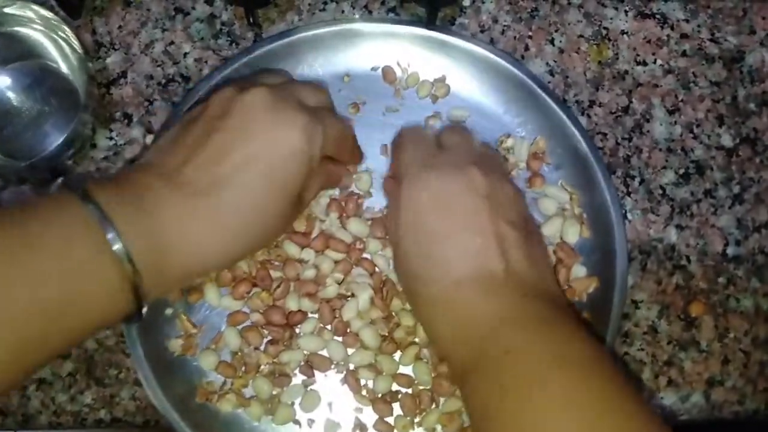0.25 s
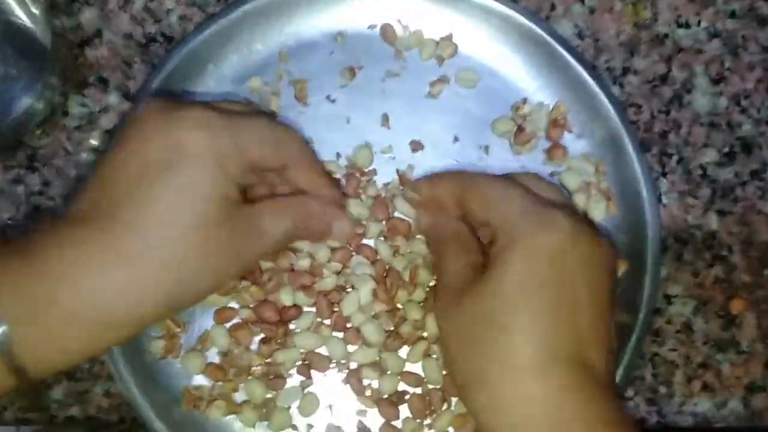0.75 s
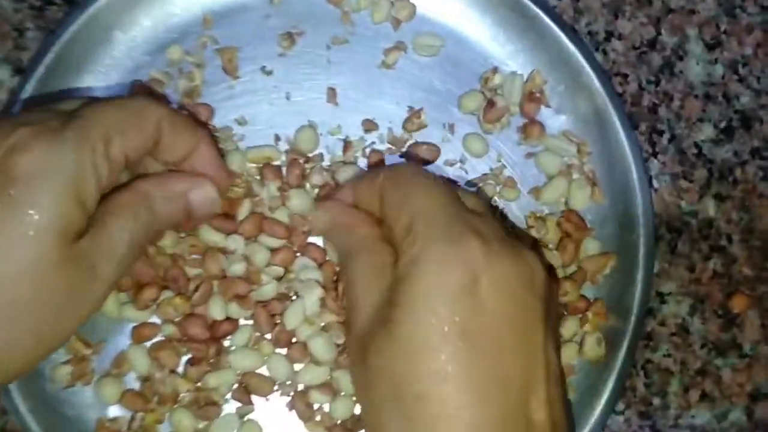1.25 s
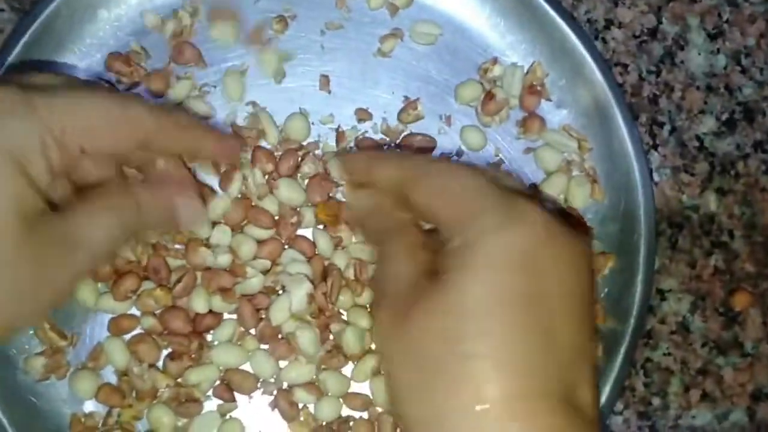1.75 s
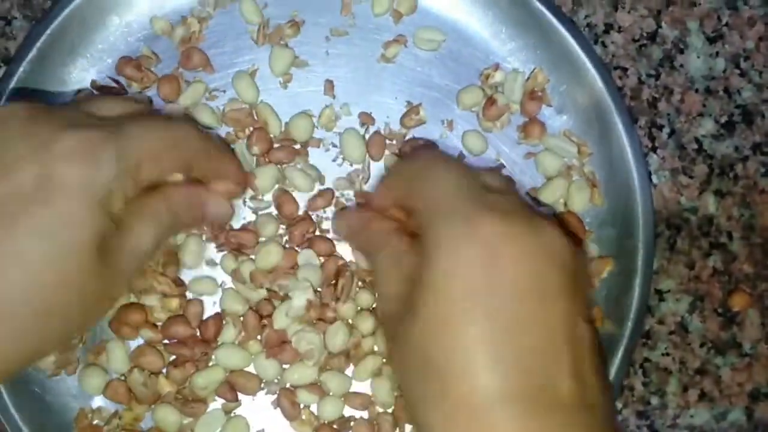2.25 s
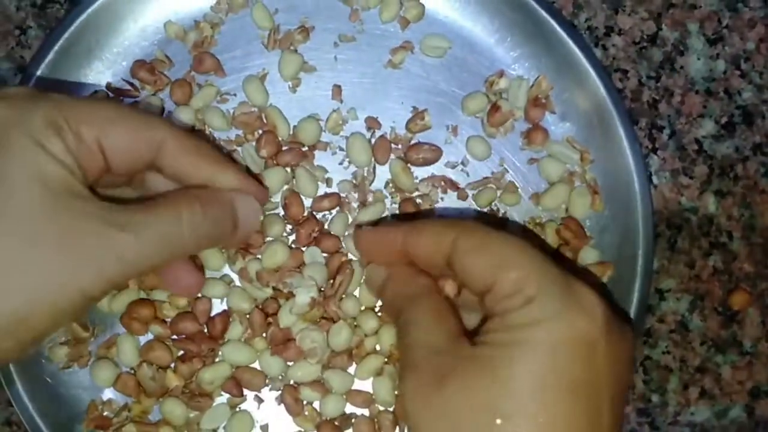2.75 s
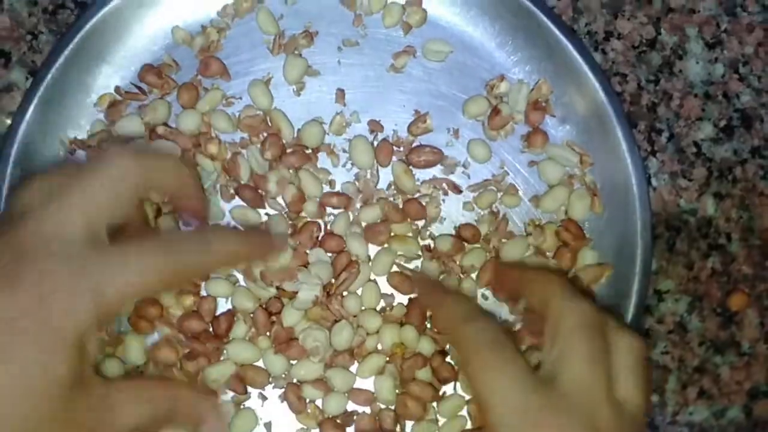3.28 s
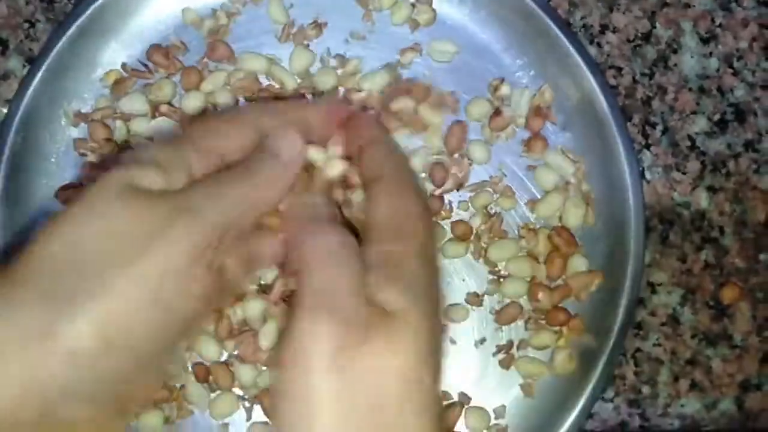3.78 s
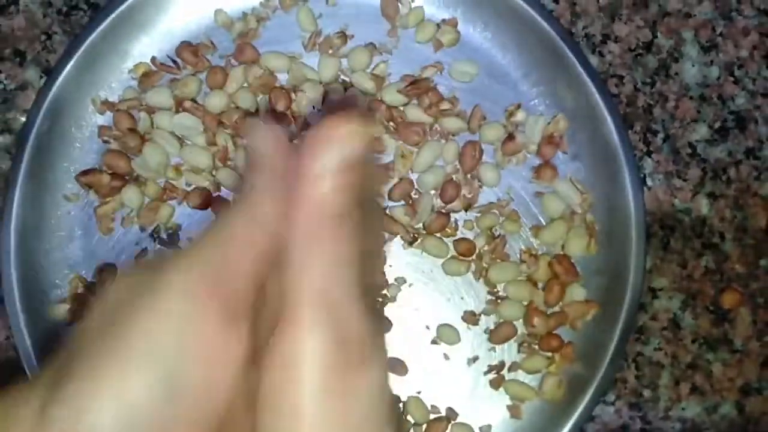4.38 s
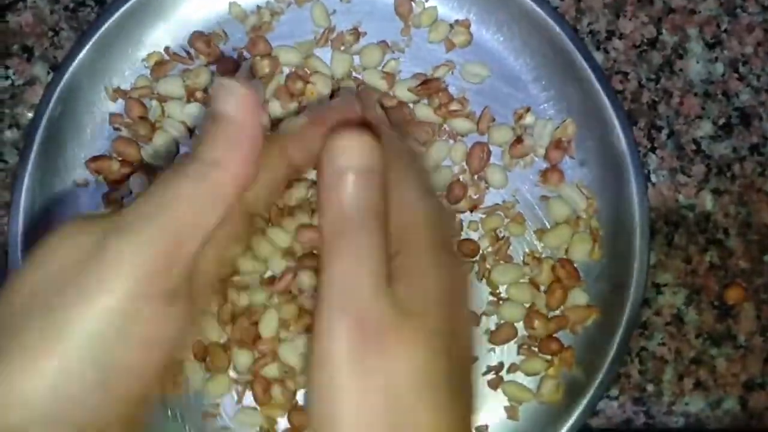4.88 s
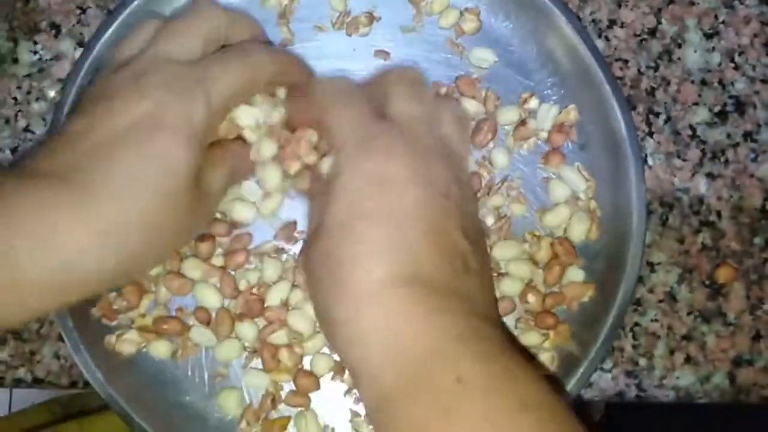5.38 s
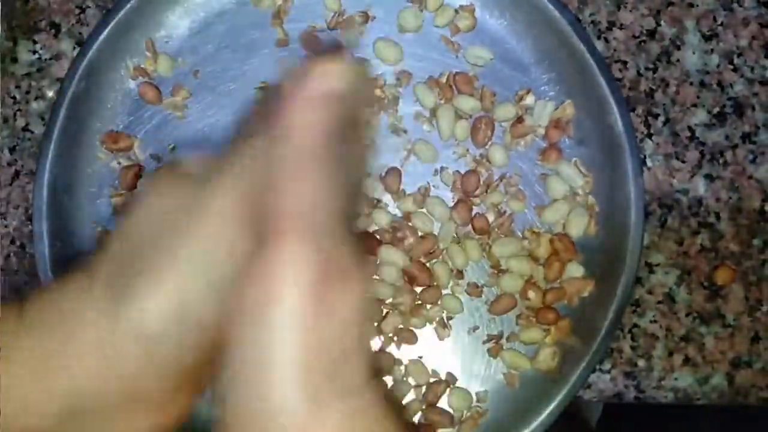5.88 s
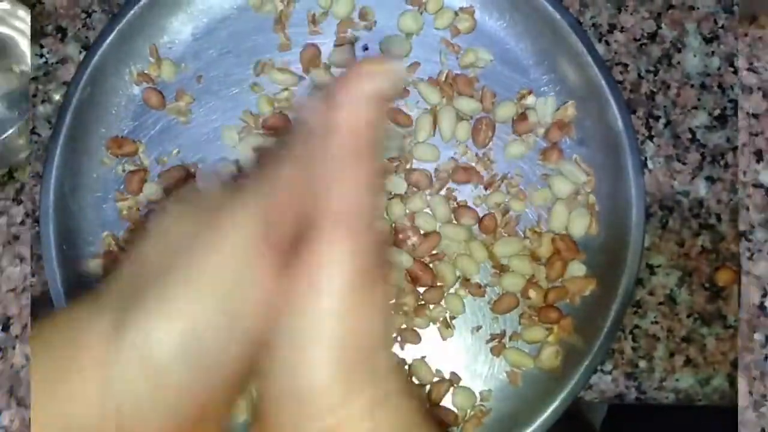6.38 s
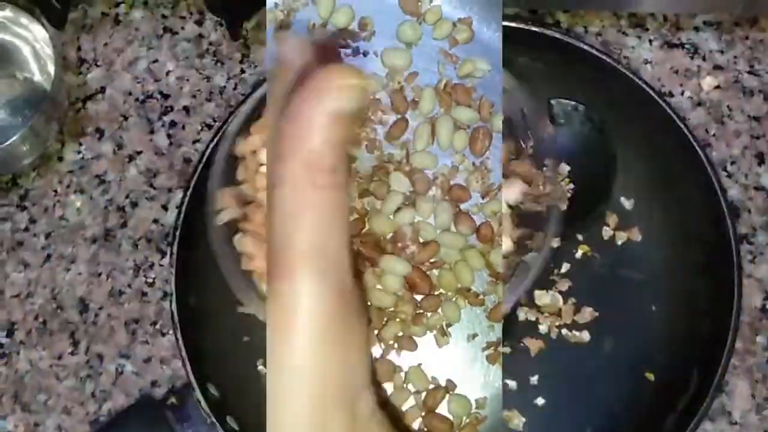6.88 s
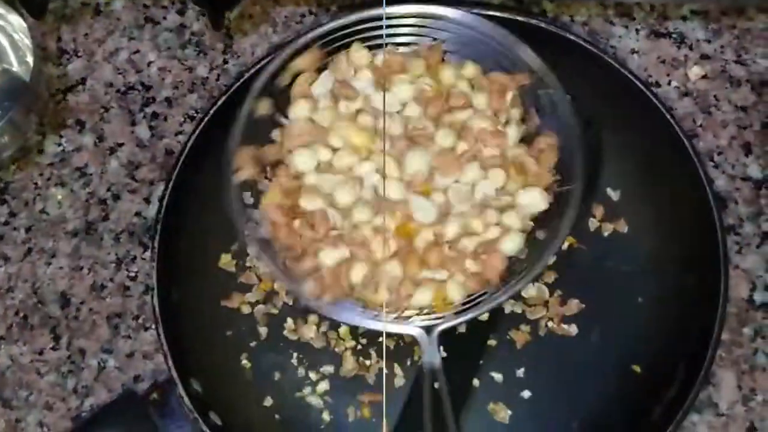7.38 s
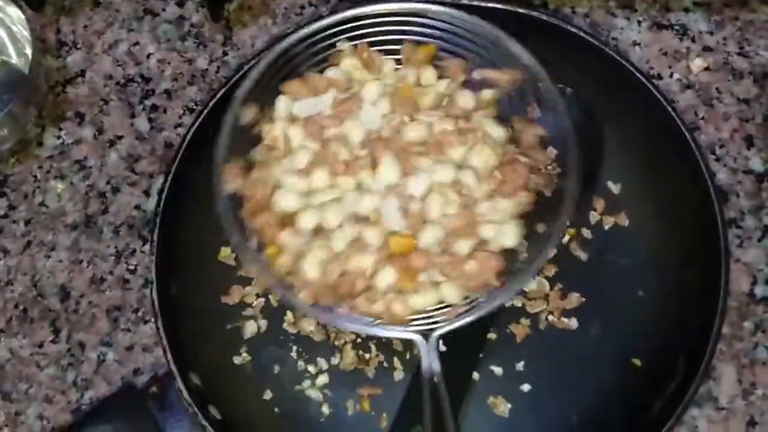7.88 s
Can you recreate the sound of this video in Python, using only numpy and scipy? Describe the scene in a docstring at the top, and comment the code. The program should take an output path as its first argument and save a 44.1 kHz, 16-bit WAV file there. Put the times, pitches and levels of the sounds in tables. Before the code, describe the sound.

Dry roasted peanuts patter and papery skins rustle as hands rub them over a steel plate, with a broad hiss swelling near the end.

```python
"""Fingers and palms rub roasted peanuts over a steel plate in a humming kitchen, close to a small microphone.
From the start nuts patter and papery skins rustle: showers of small knocks and snaps made of shaped noise.
A faint wavering sine comes and goes in the first two seconds; single knocks excite the plate's decaying
rings, skins snap as bright noise bursts and short sines squeak softly. Near the end the room's noise and
hum quickly give way to a swelling broad hiss with a lower hum, while the handling goes on and then fades."""
import sys
import numpy as np
from scipy import signal
from scipy.io import wavfile
from scipy.ndimage import uniform_filter1d, minimum_filter1d

SR = 44100
rng = np.random.default_rng(int(sys.argv[2]) if len(sys.argv) > 2 else 0)


def unload_audio(sound):
    """Save the sound as a 16-bit wav file, at the path given as the first command line argument."""
    columns = np.transpose(np.atleast_2d(sound))
    # keep every value between -1 and 1, then stretch to whole-number steps
    steps = np.round(np.clip(columns, -1, 1) * 32767)
    wavfile.write(sys.argv[1], SR, steps.astype(np.int16))


N = 358974

# spectrum of the plate's crowded modes: (frequency [Hz], level [dB])
CROWDED_MODES = [(180, -53.5), (300, -36), (1060, -19.5), (1430, -5), (2930, -2), (3190, -7), (3350, -7),
                 (4230, -9), (6740, -15.5), (9240, -42.5), (16000, -37)]
CHANGE_S = 6.935  # the room starts to give way to the hiss


def gain_of(db):
    """Decibels to gain."""
    return 10 ** (np.asarray(db) / 20)


def evened(x):
    """Scales to rms 1."""
    return x / np.sqrt(np.mean(x ** 2) + 1e-20)


def read(points, hz):
    """Reads a spectrum on a log-frequency axis."""
    f, value = np.transpose(points)
    return np.interp(np.log(hz + 1), np.log(f + 1), value)


def curve(rows, column):
    """One column of a table, interpolated at every sample."""
    rows = np.asarray(rows)
    return np.interp(np.arange(N) / SR, rows[:, 0], rows[:, column])


def drift(count, size):
    """Slow random movement at rms 1: noise averaged over size samples."""
    return evened(uniform_filter1d(rng.standard_normal(count), size=size))


def add(mix, s, sound):
    """Mixes a sound in at a time."""
    part = mix[round(s * SR):][:len(sound)]
    part += sound[:len(part)]


def coloured(x, db_of_hz):
    """Causal filter with the given gain: the phase follows from the log gain."""
    hz = abs(np.fft.fftfreq(1024, 1 / SR))
    log_gain = np.log(gain_of(np.maximum(db_of_hz(hz), -100)))
    taps = np.fft.ifft(np.exp(np.conj(signal.hilbert(log_gain)))).real
    early, late = taps[:512], taps[512:]
    if abs(early).sum() > abs(late).sum():
        taps = early
    else:  # the response came out backwards in time
        taps = np.roll(taps[::-1], 1)[:512]
    return signal.oaconvolve(x, taps)[:len(x)]


def in_band(x, lo_hz, hi_hz):
    """Band-pass, used to read a level."""
    return signal.sosfilt(signal.butter(3, [lo_hz, hi_hz], "bandpass", fs=SR, output="sos"), x)


def peak_set(x, db, lo_hz, hi_hz):
    """Scales so that the loudest 4 ms of a band has the level db."""
    power = uniform_filter1d(in_band(x, lo_hz, hi_hz) ** 2, size=176)
    return x * gain_of(db) / np.sqrt(power.max())


def shower(sounds, per_s, spread_db):
    """Many small sounds at random moments, a few of them large."""
    starts = rng.random(N) < per_s / SR
    size = gain_of(spread_db * np.minimum(rng.exponential(1, N), 3)) * starts
    which = rng.integers(0, len(sounds), N)
    return sum(signal.oaconvolve(size * (which == k), evened(s))[:N] for k, s in enumerate(sounds))


def wash(spectrum, patchy_db):
    """Steady noise whose spectrum has patches drifting in time and frequency."""
    size = 4096
    frames, hz = N // 1024 + 6, np.fft.rfftfreq(size, 1 / SR)
    a, b, patches = rng.standard_normal((frames, len(hz), 3)).T
    patches = uniform_filter1d(patches, size=40, axis=0)  # over frequency
    patches = evened(uniform_filter1d(patches, size=4, axis=1))  # over time
    z = (a + 1j * b) * gain_of(read(spectrum, hz)[:, None] + patchy_db * patches)
    return evened(signal.istft(z, nperseg=size, noverlap=3072)[1][:N])


def sine(hz):
    """A steady sine at rms 1."""
    return np.sqrt(2) * np.sin(hz * 2 * np.pi * np.arange(N) / SR)


def room():
    """Patchy room noise with a sine hum; it sinks before the hiss enters."""
    # room noise spectrum: (frequency [Hz], level [dB])
    room_spectrum = [(5, 6), (20, 1), (45, -3.5), (75, -3), (100, -8.5), (125, -2.5), (250, -11.5),
                     (530, -9.5), (900, -13.5), (1800, -12), (4500, -26.5), (6700, -43), (9400, -30),
                     (15300, -10.5)]
    # sinking of the room: (from [s], to [s], final change [dB])
    from_s, to_s, sag_db = (5.6, 6.3, -5)
    noise_db, hum_hz, hum_over_noise_db = -41.5, 99.8, -15
    tone = gain_of(hum_over_noise_db) * sine(hum_hz)
    sag = gain_of(np.interp(np.arange(N) / SR, [from_s, to_s], [0, sag_db]))
    return gain_of(noise_db) * (wash(room_spectrum, 1.54) + tone) * sag


def hiss():
    """Broad patchy noise with a sine hum; it enters softer and swells exponentially."""
    # hiss spectrum: (frequency [Hz], level [dB])
    hiss_spectrum = [(12, -31), (20, 10.5), (55, -27), (93, 2.5), (116, -42), (146, -3.5), (241, -15),
                     (301, -3), (367, -8.5), (825, -4), (2390, -10.5), (4540, -22), (6720, -18.5),
                     (9140, -31.5), (16000, -12.5)]
    swollen_db, hum_hz, hum_over_noise_db = -32.5, 89, -17.5
    start_db, swell_s = -6.5, .22  # start against the swollen level; time constant
    tone = gain_of(hum_over_noise_db) * sine(hum_hz)
    since = np.maximum(np.arange(N) / SR - CHANGE_S, 0)
    swell = gain_of(start_db * np.exp(-since / swell_s))
    return gain_of(swollen_db) * (wash(hiss_spectrum, 1.4) + tone) * swell


def faint_tone():
    """A sine with a wavering phase comes and goes early on."""
    # rms of the tone: (time [s], level [dB])
    tone_levels = [(.25, -80), (.5, -55), (.75, -68), (.95, -59), (1.35, -56.5), (1.6, -64), (1.9, -94)]
    tone_hz = 763
    waver = 1.2 * drift(N, 3000)  # radians
    turns = 2 * np.pi * np.arange(N) / SR
    return np.sqrt(2) * gain_of(curve(tone_levels, column=1)) * np.sin(tone_hz * turns + waver)


def lurch():
    """The rest level swings as a decaying sine, below hearing, where the hiss comes in."""
    start_s, size, swing_hz, decay_s = 6.938, .167, 2.4, .1
    t = np.maximum(np.arange(N) / SR - start_s, 0)
    swing = size * np.sin(2 * np.pi * swing_hz * t) * np.exp(-t / decay_s)
    return uniform_filter1d(swing, size=300)


def background():
    """The room gives way to the hiss at equal power; the faint tone and the swing lie beside them."""
    fade_s = .016
    changed = np.clip((np.arange(N) / SR - CHANGE_S) / fade_s, 0, 1)
    return room() * np.sqrt(1 - changed) + hiss() * np.sqrt(changed) + faint_tone() + lurch()


def squeak(db, hz, length):
    """A sine of slightly unsteady pitch under a soft hump."""
    t = np.arange(0, length, 1 / SR)
    wobble = 1 + .05 * drift(len(t), 90)
    tone = np.sin(2 * np.pi * np.cumsum(hz * wobble) / SR)
    return np.sqrt(2) * gain_of(db) * tone * signal.windows.tukey(len(t), .6)


def snap(t60, body_db):
    """A papery crack of decaying noise with its short bright tail."""
    # spectrum of a dry skin: (frequency [Hz], level [dB])
    skin_spectrum = [(2500, -19), (4500, -12), (6700, 0), (9300, -16), (11500, -14.5), (12300, -5.5),
                     (12900, -51), (14300, -7.5), (15500, -2), (16500, 12.5)]
    t = np.arange(5000) / SR
    tail = gain_of(-60 * t / np.clip(t60, .02, .2))
    tick = gain_of(19 - 60 * t / .00057)
    body = [(8000, body_db - 4), (9500, .11)]  # tilts everything below the treble
    burst = rng.standard_normal(len(t)) * (tail + tick)
    return coloured(burst, lambda f: read(skin_spectrum, f) + read(body, f))


def plate():
    """Free rings of the steel, two phases each: the clear modes and a crowd of weak ones."""
    # clear modes: (frequency [Hz], level before the lift below [dB], half the free t60 [s])
    clear_modes = [(785, -17, .1), (926, -12, .07), (1265, -12, .09), (1440, -3, .17), (1711, -8, .2),
                   (1804, -6, .27), (1960, -7, .15), (2316, -3, .14), (2545, -9, .2), (2820, -8, .13),
                   (3030, -6, .16), (3328, -4, .18), (3422, -2, .15), (3710, -12, .2), (3862, -5, .15),
                   (4008, -11, .22), (4253, -15, .12), (4456, -11, .18), (4732, -19, .2), (5206, -15, .2),
                   (5469, -21, .2), (5819, -18, .2), (6185, -19, .2), (6548, -8, .14), (6944, -17, .2),
                   (7192, -19, .14)]
    clear_lift_db, count = 11, 70
    t = np.arange(6000) / SR
    clear_hz, clear_db, half_t60 = np.transpose(clear_modes)
    weak_hz = np.linspace(500, 8500, num=count) + 35 * rng.standard_normal(count)
    shortest_t60 = read([(1500, 1.0), (6000, .71)], weak_hz)  # treble dies first
    weak_t60 = shortest_t60 * rng.uniform(1.0, 2.1, count)
    hz = np.r_[clear_hz, weak_hz][:, None]
    db = np.r_[clear_db + clear_lift_db, read(CROWDED_MODES, weak_hz)][:, None]
    t60 = np.r_[2 * half_t60, weak_t60][:, None]
    fading = gain_of(db - 60 * t / t60)
    return hz[:, 0], fading * np.sin(2 * np.pi * hz * t), fading * np.cos(2 * np.pi * hz * t)


def knock(rings, centre_hz, t60, middle_db, upper_db, thud_db, ring_db, tick_db, focus_db):
    """A tick, a dry rattle and the plate's rings, weighted by where the nut lands."""
    hz, sines, cosines = rings
    t = np.arange(sines.shape[1]) / SR
    t60 = np.clip(t60, .03, .35)
    nearest_db = 11  # lift of the ring nearest to where the nut lands
    even_rise_s, rise_slope = .00087, 2.1  # rise at even ring and rattle; dB of rise time per dB of ring

    spot, phase = rng.standard_normal((2, len(hz)))
    nearness = np.exp(-((hz / centre_hz - 1) / .025) ** 2)
    share = gain_of(4.5 * spot + nearest_db * nearness)
    phase = 1.1 * phase  # a blow starts the rings roughly together
    ring = share * np.cos(phase) @ sines + share * np.sin(phase) @ cosines
    ring = ring * gain_of(-30 * t / t60)  # nuts lying on the steel shorten the ring

    rattle = evened(rng.standard_normal(len(t)) * gain_of(-60 * t / t60))
    start_level = np.abs(rattle[:20]).mean()
    tick = start_level * gain_of(tick_db - 60 * t / .004) * rng.standard_normal(len(t))
    rattle = evened(coloured(rattle + tick, lambda f: read(CROWDED_MODES, f)))
    jostle = gain_of(4.5 * drift(len(t), 130))  # neighbours hop and land
    clack = 1 + gain_of(-8 - 60 * t / .03)  # the nut's own short clack while it touches
    both = (rattle * jostle + gain_of(ring_db) * evened(ring)) * clack

    shape = [(400, thud_db + 27), (1100, thud_db + 23.5), (1350, .051), (2600, .22),
             (3000, middle_db + 10), (4500, middle_db + 9.5),
             (5300, upper_db + 14.5), (7500, upper_db + 19.5), (9000, upper_db + 24)]

    def tone_db(f):
        octaves = np.log2((f + 1) / centre_hz)
        return read(shape, f) - focus_db * np.minimum(octaves ** 2, 1.5)

    rise_s = even_rise_s * gain_of(-rise_slope * ring_db)  # a dull crunch swells, a clear knock snaps
    return coloured(both, tone_db) * np.minimum(t / rise_s, 1)


def hands(rings):
    """Rolling nuts patter on the plate and skins rustle; bare steel rings out where both are busy."""
    # hands at work: (time [s], patter level at 1.2-2.7 kHz [dB], rustle level at 5.5-16 kHz [dB])
    effort = [(0, -41, -42.5), (.18, -51, -38.5), (.38, -41, -44.5), (.63, -53.5, -44), (1.45, -51, -46.5),
              (1.7, -45, -43), (2.2, -42.5, -40), (2.45, -46.5, -42.5), (3.04, -49.5, -45.5),
              (3.15, -39, -42), (3.33, -44, -48), (3.44, -38, -34.5), (3.76, -37.5, -37),
              (4.05, -49.5, -39.5), (4.28, -44.5, -35), (4.4, -50, -39.5), (4.58, -50.5, -39),
              (4.66, -42.5, -37.5), (4.85, -42.5, -43), (4.94, -40, -58), (5.24, -48, -41),
              (5.46, -37, -31), (5.87, -42, -35), (6.03, -45, -32), (6.12, -43, -35), (6.25, -41.5, -37),
              (6.37, -37.5, -35), (6.56, -49, -39), (6.88, -48, -41), (7.19, -49.5, -34.5),
              (7.51, -70, -48), (7.73, -46, -32.5), (8.14, -81, -79)]
    middling_db = -42  # mean of patter and rustle at a middling effort
    middling_bare_db, bare_slope = -47.5, 1.56  # bright patter at that effort; its growth in dB per dB

    dull_knocks = [knock(rings, hz, .2, -31.5, -5, -10.5, .73, tick_db=-9, focus_db=18.5)
                   for hz in np.geomspace(1450, 2400, num=10)]
    bright_knocks = [knock(rings, hz, .081, .65, -10, -4, .57, tick_db=-9, focus_db=4.5)
                     for hz in np.geomspace(2800, 4200, num=8)]
    dull = shower(dull_knocks, per_s=140, spread_db=2.5)
    bright = shower(bright_knocks, per_s=110, spread_db=2.25)
    rustle = shower([snap(.21, 0) for _ in range(8)], per_s=210, spread_db=1.3)

    patter_db, rustle_db = curve(effort, column=1), curve(effort, column=2)
    bare_db = middling_bare_db + bare_slope * ((patter_db + rustle_db) / 2 - middling_db)

    def levelled(x, db, *band):
        return x / np.std(in_band(x, *band)) * gain_of(db)

    return (levelled(dull, patter_db, 1200, 2700) + levelled(bright, bare_db, 2700, 4800)
            + levelled(rustle, rustle_db, 5500, 16000))


def blows(rings):
    """The single squeaks, skin snaps and knocks of nuts on the plate, each at its own time."""
    # brief soft squeaks: (time [s], level under the top of the hump [dB], pitch [Hz], length [s])
    squeak_rows = [(0.302, -41.5, 956, 0.034), (0.682, -50.5, 1330, 0.045), (1.297, -47, 2180, 0.026),
                   (1.34, -56, 1085, 0.031), (2.823, -42.5, 1350, 0.035), (2.982, -47, 1110, 0.063),
                   (3.017, -54, 1017, 0.054), (4.131, -45, 1080, 0.066), (5.18, -53, 1080, 0.051)]
    # skins snapping: (time [s], peak level at 8-16 kHz [dB], t60, at most 0.2 [s], body tilt [dB])
    snap_rows = [(0.0483, -33, 0.14, -17), (0.2094, -33, 0.12, -18), (0.394, -19.5, 0.14, -9),
                 (0.4534, -28.5, 0.26, -4), (0.504, -13, 0.26, 3.5), (0.8215, -32, 0.2, -2),
                 (0.9344, -33, 0.16, -1), (1.261, -33, 0.24, 5), (1.3209, -27, 0.17, -2.5),
                 (1.4308, -25, 0.28, -3), (1.4663, -28, 0.14, -2), (1.6116, -24.5, 0.12, -6),
                 (2.1245, -23, 0.14, -5), (2.435, -23.5, 0.15, -8), (2.4648, -29, 0.14, -13),
                 (2.4766, -22, 0.2, 1.5), (2.5837, -31.5, 0.14, -3), (2.622, -31, 0.17, -5),
                 (2.6923, -24, 0.17, -9), (2.762, -20.5, 0.19, -1.5), (2.799, -13.5, 0.14, -10),
                 (2.8795, -23, 0.24, -7), (2.9517, -32, 0.13, -7), (3.0051, -21.5, 0.13, -0.5),
                 (3.8994, -43, 0.14, 2), (4.041, -27.5, 0.26, -5.5), (4.2026, -27, 0.24, 7.5),
                 (4.4436, -31, 0.2, 0), (4.589, -28, 0.22, -7), (4.6287, -25.5, 0.21, 1.5),
                 (4.7367, -33, 0.14, 6.5), (4.7686, -43, 0.14, 3), (4.987, -41, 0.14, -4),
                 (5.1861, -31, 0.13, -15), (5.2787, -30, 0.2, 1.5), (5.9734, -14, 0.12, 2),
                 (6.1536, -25, 0.14, -4), (6.3124, -37, 0.14, 5), (6.453, -30, 0.15, 3),
                 (6.6448, -29, 0.14, 3), (6.6633, -23.5, 0.12, -2), (7.2144, -30, 0.065, 3),
                 (7.4874, -37, 0.14, -9)]
    # nuts knocking the plate: (time [s], peak level at 1-5 kHz [dB], strongest ring [Hz],
    # rattle t60, at most 0.35 [s], middle rings [dB], upper rings [dB], ring over rattle [dB])
    knock_rows = [(0.0912, -38, 1960, 0.17, -11, -15, 1), (0.1251, -34.5, 2620, 0.28, -16, -11, -1),
                  (0.2134, -35, 1520, 0.12, -18, -15, 5), (0.3626, -33, 1700, 0.23, -23, -11, 2),
                  (0.5043, -42, 3480, 0.18, -9, -10, 1), (0.5202, -35, 1770, 0.22, -17, -17, 2),
                  (0.5444, -31.5, 1640, 0.22, -15, -21, 2), (0.5784, -37, 1630, 0.13, -11, -15, -2),
                  (0.7981, -39, 1440, 0.13, -16, -15, 5), (0.846, -39.5, 1820, 0.18, -7, -11, 3),
                  (0.8879, -33, 1464, 0.34, 0, -20, 0), (0.9996, -32, 1570, 0.14, -21, -23, 0),
                  (1.1947, -34, 1760, 0.46, -40, -13, 9), (1.3937, -29.5, 1890, 0.28, -28, -17.5, 3),
                  (1.6102, -35, 1650, 0.069, -37, -15, -1), (1.6666, -30, 1500, 0.18, -18, -21, 2),
                  (1.699, -20.5, 3730, 0.12, -9, -21, 9), (1.737, -27.5, 1550, 0.26, -14, -17, 3),
                  (1.8602, -30.5, 2170, 0.18, -13.5, -22, -2), (1.9245, -30, 1980, 0.29, -14, -22, -3),
                  (1.9535, -22.5, 1910, 0.17, -16, -24, 1), (2.0058, -30, 2160, 0.2, -12, -9, 5),
                  (2.0537, -27.5, 1980, 0.21, -6, -8, 1), (2.0976, -24, 2800, 0.21, -15, -17.5, 0),
                  (2.1256, -27, 1990, 0.16, -10, -15, 2), (2.2493, -24, 1800, 0.16, -13, -18, 1.5),
                  (2.2947, -22.5, 1460, 0.12, -8, -24, 1), (2.3236, -26.5, 1730, 0.3, -12, -24, 3),
                  (2.3925, -24.5, 2570, 0.14, -7, -17, 0.5), (2.4773, -27.5, 3010, 0.06, 4, -15, -2),
                  (2.5277, -31.5, 2000, 0.06, -11, -12, 4), (2.6174, -33.5, 3830, 0.38, -14, -17, 4),
                  (2.7506, -34, 2050, 0.23, -9, -20, -6), (3.0659, -36, 1830, 0.16, -1, -7, 0),
                  (3.0959, -20.5, 2280, 0.082, -9, -13, 3), (3.1318, -20.5, 2140, 0.15, -23, -18, -1),
                  (3.1428, -19, 3400, 0.23, -11.5, -22, 6.5), (3.2101, -23, 1720, 0.12, -10, -12, 4.5),
                  (3.258, -23.5, 1860, 0.12, -10.5, -9.5, 1), (3.3657, -28, 1690, 0.23, -14, -15, 5),
                  (3.3947, -6.5, 3310, 0.082, -5.5, -21.5, 2), (3.4074, -14.5, 3360, 0.16, -24, -24, 4.5),
                  (3.5094, -33, 1440, 0.21, -9, -18, -5), (3.5902, -29, 2180, 0.22, -8, -5, 7),
                  (3.6426, -20, 1720, 0.14, -6, -11.5, 3), (3.6994, -43, 1700, 0.18, -8, -15, 3),
                  (3.7279, -25.5, 1720, 0.26, -9, -15, 6), (3.7594, -26.5, 1660, 0.27, -16, -11, 0),
                  (3.8601, -26, 2900, 0.13, -14, -13, 0), (3.925, -34, 2900, 0.33, -14, -8, -2),
                  (3.9654, -34.5, 2320, 0.12, -12, -18, 1), (4.0781, -21, 2390, 0.15, -15, -13, 6),
                  (4.2263, -32, 1800, 0.2, -6, -15, 5), (4.2772, -27, 3560, 0.14, -15, -17, 6),
                  (4.3735, -20.5, 1870, 0.19, -7, -15, -1), (4.6214, -33, 1710, 0.21, -11, -15, 9),
                  (4.7691, -15, 3450, 0.11, -7.5, -12.5, 2.5), (4.8943, -27.5, 2540, 0.25, -10, -5, 8),
                  (4.9172, -19, 2300, 0.23, -7.5, -7, 5), (4.9571, -19.5, 2380, 0.18, -14, -16, 0),
                  (4.9726, -21, 1710, 0.12, -7, -12, -4), (4.9861, -19, 1640, 0.096, -6, -19, -2),
                  (4.9954, -10, 3030, 0.14, -14, -19.5, 3.5), (5.017, -14, 2980, 0.13, -6, -13, 3.5),
                  (5.0454, -23.5, 1710, 0.14, -7, -18, -5), (5.0814, -25, 1830, 0.2, -19, -22, -1),
                  (5.2744, -24.5, 1840, 0.28, -10, -12, 3.5), (5.3163, -26.5, 2500, 0.21, -15, -14, -2),
                  (5.3572, -24, 2300, 0.4, -9, -3, 4), (5.4006, -26, 2120, 0.22, -6, -6, 1),
                  (5.4136, -19.5, 2080, 0.19, -10, -14, -1), (5.4504, -28.5, 1800, 0.18, -4, -18, -2),
                  (5.5059, -23.5, 2000, 0.18, -2, -11, -1), (5.5692, -22.5, 1780, 0.18, -14, -17, 2),
                  (5.6276, -27.5, 1700, 0.18, -21, -28, 3), (5.7937, -17.5, 2780, 0.17, -13, -18, 4),
                  (5.8451, -26.5, 2740, 0.18, -12, -22, 6), (5.898, -21.5, 1480, 0.12, -11, -24, 5),
                  (5.9733, -5, 2340, 0.13, -9, -11.5, 5), (6.0631, -14, 1430, 0.12, -8.5, -12, 6.5),
                  (6.0935, -11.5, 2370, 0.19, -9, -15, 5.5), (6.1094, -15, 3460, 0.15, -8.5, -14, 3.5),
                  (6.1504, -14.5, 3500, 0.19, -11.5, -14, 3), (6.3121, -18, 1370, 0.28, -3, -6, 3),
                  (6.3739, -27, 1810, 0.35, -5, -10, 1), (6.4896, -21.5, 1440, 0.22, -3.5, -12, 2),
                  (6.6692, -28, 2400, 0.18, -12, -15, 5.5), (6.6927, -24, 2820, 0.16, -10, -5.5, 6),
                  (6.787, -29, 2400, 0.2, -8, 1, 6), (6.8428, -36, 2540, 0.12, -13, -25, 5),
                  (7.0419, -27, 3200, 0.13, -11, -12, 3), (7.3033, -30, 2950, 0.13, -11, -10, 5),
                  (7.5153, -31.5, 2600, 0.29, -14, -15, 2), (7.6435, -27.5, 2310, 0.24, -8.5, -6, 0),
                  (7.7084, -33.5, 2800, 0.18, -4, -18, 2), (7.9139, -34.5, 1780, 0.2, -2, -15, 3)]
    thud_db = -24
    tick_at_0_db, tick_slope = 16.5, .29  # tick of a 0 dB knock [dB]; its fall for softer ones [dB per dB]
    focus = .23  # the softer a knock, the closer it gathers round its strongest ring [dB per dB]

    out = np.zeros(N)
    for s, *rest in squeak_rows:
        add(out, s, squeak(*rest))
    for s, db, *rest in snap_rows:
        add(out, s, peak_set(snap(*rest), db, 8000, 16000))
    for s, db, hz, t60, middle_db, upper_db, ring_db in knock_rows:
        sound = knock(rings, hz, t60, middle_db, upper_db, thud_db, ring_db,
                      tick_db=tick_at_0_db + tick_slope * db, focus_db=-focus * db)
        add(out, s, peak_set(sound, db, 1000, 5000))
    return out


def scene():
    """All sources at one microphone."""
    rings = plate()
    return (background() + hands(rings) + blows(rings))[None]


def record(dry):
    """A limiter holds the loudest peaks just under full scale; then a low-pass limits the band."""
    ceiling, edge_hz = .98, 15800
    peak = -minimum_filter1d(-abs(dry), size=89)  # highest peak within 2 ms
    held = dry / uniform_filter1d(np.maximum(peak / ceiling, 1), size=45)
    low_pass = signal.firwin(511, edge_hz, window=("kaiser", 9), fs=SR)
    return signal.oaconvolve(held, low_pass[None], "same")


dry = scene()
out = record(dry)
unload_audio(out)
```